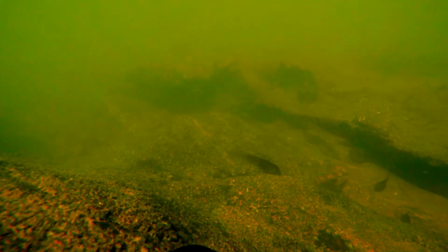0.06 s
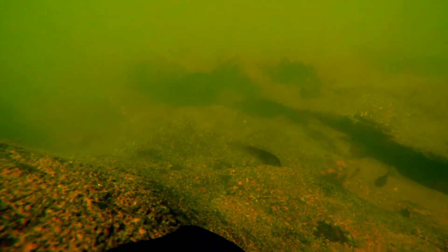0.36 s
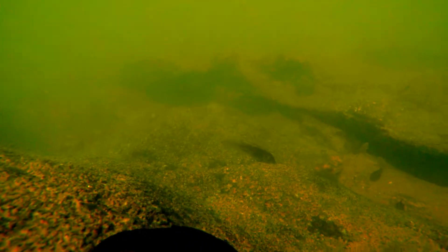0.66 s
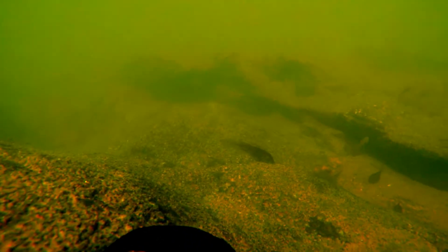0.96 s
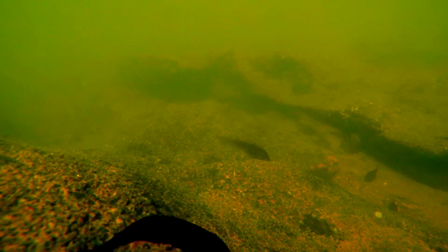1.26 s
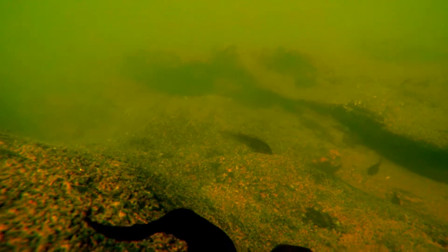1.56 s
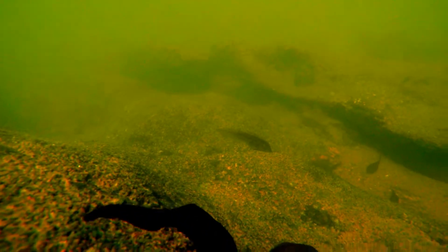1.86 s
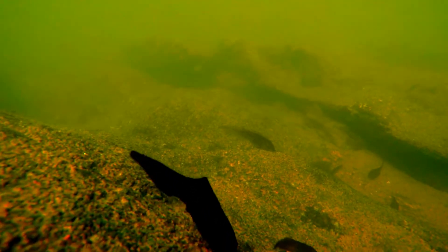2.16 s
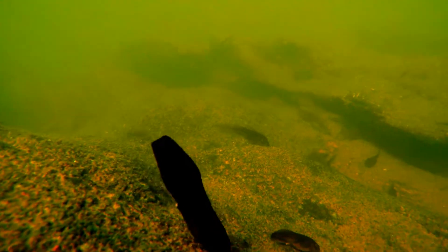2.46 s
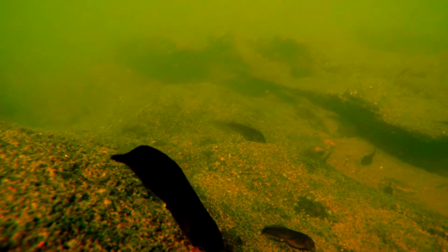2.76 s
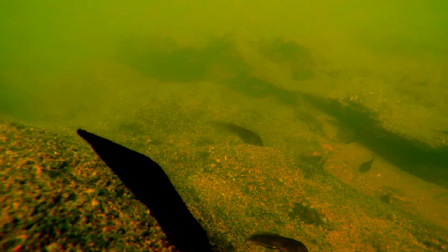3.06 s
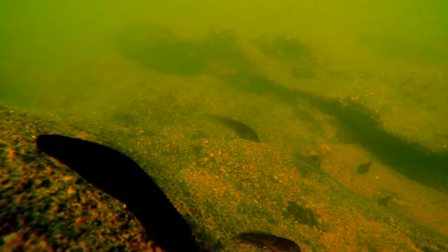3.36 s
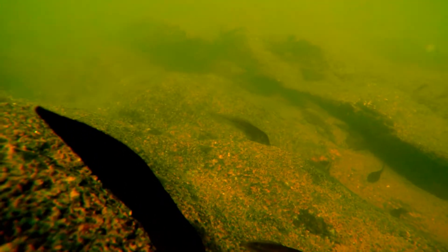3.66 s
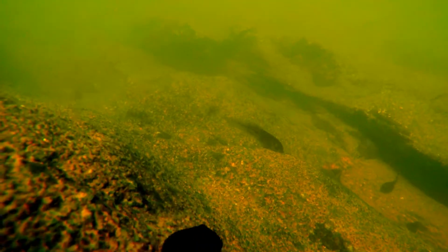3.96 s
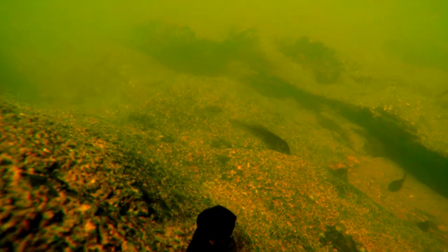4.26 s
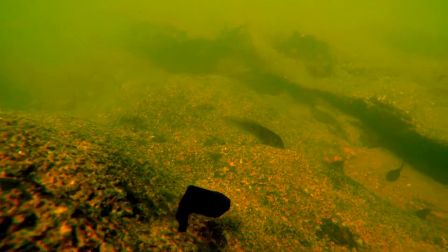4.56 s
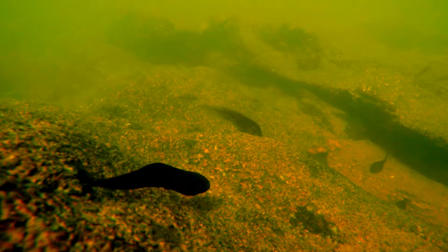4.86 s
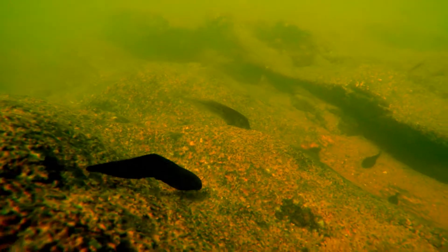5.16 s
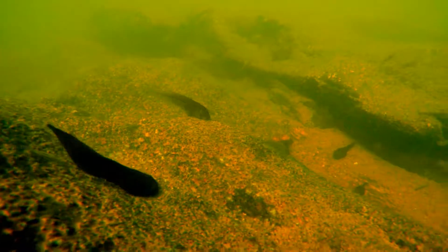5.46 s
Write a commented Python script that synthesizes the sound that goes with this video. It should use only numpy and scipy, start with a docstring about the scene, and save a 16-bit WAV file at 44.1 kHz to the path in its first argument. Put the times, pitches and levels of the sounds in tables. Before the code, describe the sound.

A stream is heard underwater from inside a waterproof case just above the bed. Throughout, the current makes a low, lumpy rumble, with muffled bubbles gurgling further off and a faint electronic hiss. At 0.5 seconds the case knocks hard on stone, dull and hollow, and the overall level briefly ducks. Short, muffled scuffs over grit and lighter knocks follow until about 1.8 seconds, with a firmer knock and one small close bubble blip near 1.3. A few scuffs and a light knock come between 2.4 and 2.7 seconds. Near 3.5 the current swells and the case hits hard again, then scuffs and bumps around 3.9. Two soft, low surges thump at about 4.2 and 4.3 seconds. A strong knock with a scrape lands at 4.5, and lighter knocks come near 5.1 and 5.4 as the water keeps rumbling.

```python
"""A stream, from a microphone inside a waterproof camera housing held just above the bed.
From the start eddies rumble on the case, bubbles gurgle dully further off and the electronics hiss.
Half a second in, the case knocks hard on stone and the gain control ducks. Scuffs over grit and lighter
knocks follow, and at 1.3 s one bubble rings close by. Near 3.5 s the current swells and the case hits
hard again. Two surges of the current thump softly just after 4.2 s, then more knocks and scuffs follow."""
import sys
import numpy as np
from scipy import signal
from scipy.fft import rfft, irfft
from scipy.io import wavfile
from scipy.ndimage import uniform_filter1d, minimum_filter1d

SR = 44100
rng = np.random.default_rng(int(sys.argv[2]) if len(sys.argv) > 2 else 0)


def transcribe(signal):
    """Save signal, clipped to [-1, 1], as a 16-bit WAV file at the path in sys.argv[1]."""
    frames = np.atleast_2d(signal).T
    limited = np.clip(frames, -1, 1)
    pcm = np.round(limited * 32767).astype(np.int16)
    wavfile.write(sys.argv[1], SR, pcm)


N = 242991


def amp(db):
    """Decibels to gain."""
    return 10 ** (np.asarray(db) / 20)


def unit_rms(x):
    """Scales to rms 1."""
    return x / np.sqrt(np.mean(x ** 2) + 1e-20)


def follow(curve):
    """Gain at every sample, from rows of seconds and dB."""
    return amp(np.interp(np.arange(N) / SR, *np.transpose(curve)))


def colour(x, spectrum):
    """Filters x by rows of Hz and dB, silent above the last row, and scales to rms 1."""
    row_hz, row_db = np.transpose(spectrum)
    hz = np.fft.rfftfreq(len(x), 1 / SR)
    gain = amp(np.interp(np.log(hz + 1), np.log(row_hz + 1), row_db)) * (hz < row_hz[-1])
    return unit_rms(irfft(rfft(x) * gain, len(x)))


def drift(rate_hz):
    """A random wander of rms 1 that changes about rate_hz times a second."""
    hz = np.fft.rfftfreq(N, 1 / SR)
    return unit_rms(irfft(rfft(rng.standard_normal(N)) * np.exp(-(hz / rate_hz) ** 2), N))


def add(mix, start_s, sound):
    """Adds a sound to the mix at start_s."""
    part = mix[max(round(start_s * SR), 0):][:len(sound)]
    part += sound[:len(part)]


def ring(hz, t60, rise_cycles, glide=0):
    """A dying sine that builds up over rise_cycles, so low ones bloom later."""
    t = np.arange(SR // 3) / SR
    build = 1 - np.exp(-(t * hz / rise_cycles) ** 2)
    decay = np.exp(-np.log(1000) * t / t60)
    return build * decay * np.sin(2 * np.pi * hz * t * (1 + glide * t))


# The noise floor at the microphone. Each row: frequency in Hz, relative spectral level in dB.
HISS_SPECTRUM = [(500, -27), (850, -4), (925, -7.5), (1030, -9.5), (1330, -11.5), (1410, -12),
                 (2060, -16.5), (3270, -28), (4640, -26), (5120, -28), (7640, -29.5), (9160, -27),
                 (10200, -28), (13300, -38.5), (15400, -50.5)]

def electronics_hiss(level_db=-53.5):
    """The steady noise of the microphone and its amplifier."""
    return amp(level_db) * colour(rng.standard_normal(N), HISS_SPECTRUM)


# Water churning further off. Each row: time in seconds, relative level in dB.
CHURN_LEVELS = [(0.0, -38), (0.63, -36), (1.26, -33.5), (2.93, -34.5), (3.54, -35.5), (5.22, -33.5),
                (5.51, -34.5)]
# The churn as heard through the wall. Each row: frequency in Hz, relative gain in dB.
GURGLE_SPECTRUM = [(70, -28), (130, 13), (180, -1), (250, -1), (330, -2.5), (410, -1.5), (500, 0),
                   (557, -8.5), (620, 1.5), (690, -5.5), (800, -15), (900, -22), (1020, -29), (1600, -64)]

def distant_bubbles(level_db=1.5, per_s=1100, spread_db=1.0, cycles=17, wash_db=-3, surge_db=1.22):
    """Surging crowds of small bubbles, each rising a little in pitch, muffled by the wall of the case."""
    crowd = np.zeros(N)
    pitches_hz = np.linspace(180, 950, 36)
    for hz in pitches_hz:
        born = rng.random(N) < per_s / len(pitches_hz) / SR
        strength = amp(spread_db * np.minimum(rng.exponential(1, N), 4))
        bubble = unit_rms(ring(hz, t60=cycles / hz, rise_cycles=0.66, glide=0.61))
        crowd += signal.oaconvolve(born * strength, bubble)[:N]
    water = unit_rms(crowd) + amp(wash_db) * rng.standard_normal(N)
    surge = amp(level_db + surge_db * drift(rate_hz=7.1))
    return colour(water, GURGLE_SPECTRUM) * follow(CHURN_LEVELS) * surge


# The current right on the housing. Each row: time in seconds, relative level in dB.
CURRENT_LEVELS = [(0.0, -30.5), (0.4, -34), (0.58, -41), (0.81, -31), (1.36, -30), (2.79, -28),
                  (3.39, -26.5), (3.51, -23), (3.7, -41.5), (3.9, -28), (4.08, -28.5), (4.86, -31.5),
                  (5.16, -23.5), (5.51, -30)]
# Its rumble from inside. Each row: frequency in Hz, relative spectral level in dB.
RUMBLE_SPECTRUM = [(6, -25), (14, -9), (26, 6), (45, 6.5), (62, -5), (85, 0.5), (110, -11.5), (160, -18.5),
                   (260, -39), (500, -63)]

def eddies(level_db=2.5, lumpy_db=2.5):
    """Turbulent pressure on the case around the microphone, in uneven lumps."""
    pressure = colour(rng.standard_normal(N), RUMBLE_SPECTRUM)
    return pressure * follow(CURRENT_LEVELS) * amp(level_db + lumpy_db * drift(rate_hz=15))


# A lone bubble close by. Each row: start in seconds, level in dB, pitch in Hz, t60 in seconds.
CLOSE_BUBBLES = [(1.334, -21, 752, 0.059)]

def close_bubble():
    """A bubble breaks free near the case and rings."""
    out = np.zeros(N)
    for start_s, db, hz, t60 in CLOSE_BUBBLES:
        add(out, start_s, amp(db) * ring(hz, t60, rise_cycles=3.0, glide=0.18))
    return out


# The housing's modes from inside. Each row: frequency in Hz, relative level in dB, t60 in seconds.
CASE_MODES = [(45, -11.5, 0.072), (79.6, 6, 0.17), (112.5, 9, 0.086), (168.3, 15, 0.062), (195.6, 7, 0.057),
              (287.4, 5.5, 0.046), (439.7, -4.5, 0.076), (494.4, -1.5, 0.074), (600, -13.5, 0.079),
              (811, -17.5, 0.062)]

def case_ring(push_hz, octaves):
    """The case after one push, at peak 1: soft pushes wake its low modes, hard ones its high modes."""
    thud = 0
    for hz, db, t60 in CASE_MODES:
        drive = np.exp(-0.5 * (np.log2(hz / push_hz) / octaves) ** 2)
        thud += amp(db) * drive * ring(hz, t60, rise_cycles=0.68)
    return thud / abs(thud).max()


# The grit's fine scratch through the wall. Each row: frequency in Hz, relative spectral level in dB.
SCRATCH_SPECTRUM = [(400, -6), (850, -4.5), (1400, 2), (2400, -12), (3800, -23), (5200, -13.5), (8000, -17),
                    (10000, -22.5), (15000, -32)]
# Drags over the bed, just under the microphone. Each row: start in seconds, length in seconds,
# rms level in dB, spread of the push in octaves, scratch in dB relative to the grinding.
GRIT_SCUFFS = [(0.478, .038, -21, 0.77, -35), (0.681, .031, -27, 0.084, -50),
               (0.786, 0.017, -23.5, 0.97, -47), (0.814, 0.12, -25.5, 0.64, -53.5),
               (0.904, 0.063, -27.5, 0.94, -41), (1.171, 0.051, -24, 0.14, -52),
               (1.221, .09, -25.5, 0.88, -35), (1.37, .11, -33, 0.11, -42), (1.765, .024, -24, 1.11, -37),
               (2.356, .034, -30, 1.13, -40), (2.563, 0.053, -26, 1.2, -37), (2.651, .09, -32.5, 1.16, -45),
               (3.51, .05, -27.5, 0.89, -34), (3.851, 0.078, -27, 0.38, -37),
               (3.926, 0.049, -27, 0.087, -33), (4.458, .041, -18.5, 1.7, -35), (4.542, .04, -31, .25, -36),
               (5.025, 0.07, -30.5, 0.92, -31)]

def grit_scuffs(slips_per_s=2000, push_hz=515, taper=0.7):
    """Grains slip under the case in quick runs and set it ringing; a trace of scratch gets through."""
    out = np.zeros(N)
    for start_s, length_s, db, octaves, scratch_db in GRIT_SCUFFS:
        slips = rng.standard_normal(SR) * (rng.random(SR) < slips_per_s / SR)
        size = round(length_s * SR)
        grind = signal.fftconvolve(slips, case_ring(push_hz, octaves))[SR - size:SR]
        scratch = amp(scratch_db) * colour(slips, SCRATCH_SPECTRUM)[-size:]
        scuff = (unit_rms(grind) + scratch) * signal.windows.tukey(size, taper)
        add(out, start_s, amp(db) * unit_rms(scuff))
    return out


# Knocks and soft low thumps on the housing, right at the microphone; those at 4.22 and 4.34 s are surges
# of the current. Each row: time in seconds, the main push's peak in dB and centre in Hz,
# the first touch's peak in dB and centre in Hz, wall clack in dB relative to that touch.
KNOCKS_AND_THUMPS = [(0.505, 3, 169, -12.5, 450, -14.5), (1.076, -18.5, 121.5, -15, 333, -28),
                     (1.259, -5, 115.3, -19, 408, -14), (1.426, -15.5, 161, -33, 450, -22),
                     (2.624, -29, 129, -12.5, 475, -16), (3.551, -1, 86.4, -6, 371, -22.5),
                     (3.956, -10.5, 59.3, -28, 450, -20), (4.224, -19, 55, -32, 400, -20),
                     (4.342, -20.5, 54.6, -47, 400, -18), (4.484, -3.5, 87.7, -11.5, 308, -9),
                     (5.057, -16, 100, -17.5, 360, -17), (5.409, -27.5, 80, -20, 380, -17.5)]

def knocks_and_thumps(touch_lead_s=0.01407, sway_lead_s=0.0091):
    """Stone or a surge pushes the case: a first touch, a sway, a softer push, then the full weight."""
    out = np.zeros(N)
    clack = case_ring(push_hz=830, octaves=0.14)  # a thin spot of the wall
    sway = amp(-7) * case_ring(push_hz=43.06, octaves=0.33)
    soften = amp(-0.5) * case_ring(push_hz=215.4, octaves=0.33)
    for at_s, main_db, main_hz, touch_db, touch_hz, clack_db in KNOCKS_AND_THUMPS:
        touch = case_ring(touch_hz, octaves=0.28) + amp(clack_db) * clack
        add(out, at_s - touch_lead_s, amp(touch_db) * touch)
        add(out, at_s - sway_lead_s, amp(main_db) * sway)
        add(out, at_s - touch_lead_s / 2, amp((touch_db + main_db) / 2) * soften)
        add(out, at_s, amp(main_db) * case_ring(main_hz, octaves=0.36))
    return out


def scene():
    """Everything at the one microphone inside the housing."""
    water = eddies() + distant_bubbles() + close_bubble()
    housing = knocks_and_thumps() + grit_scuffs()
    return (water + housing + electronics_hiss())[None]


def gain_control(x, ceiling_db=-0.23, hold_s=0.38, recovery_db_per_s=11, attack_s=0.0016):
    """Peaks over the ceiling pull the gain down just ahead of them; it holds, then creeps back."""
    over_db = np.maximum(20 * np.log10(abs(x).max(0) + 1e-9) - ceiling_db, 0)
    hold, attack = round(hold_s * SR), round(attack_s * SR)
    held_db = -minimum_filter1d(-over_db, hold, origin=(hold - 1) // 2 - attack, mode="constant")
    recovery_db = np.arange(N) * recovery_db_per_s / SR
    duck_db = np.maximum.accumulate(held_db + recovery_db) - recovery_db
    smooth_db = uniform_filter1d(uniform_filter1d(duck_db, attack), attack)
    return x * amp(-smooth_db)


def record(dry, cutoff_hz=15400):
    """Behind the microphone: the camera's gain control, then its band limit."""
    low_pass = signal.firwin(511, cutoff_hz, window=("kaiser", 9), fs=SR)
    return signal.oaconvolve(gain_control(dry), low_pass[None], "same")


dry = scene()
out = record(dry)
transcribe(out)
```